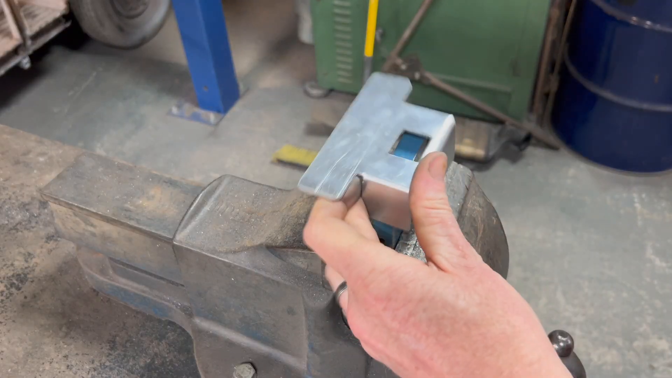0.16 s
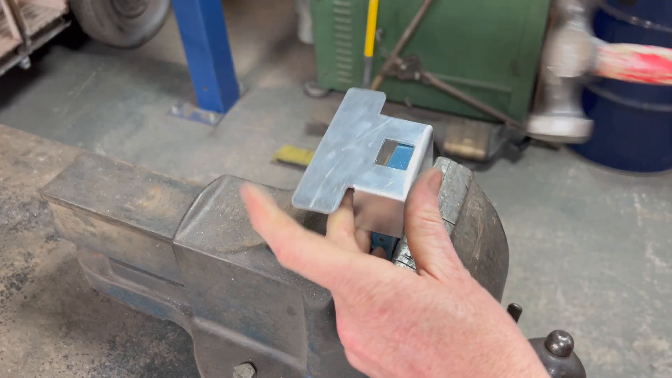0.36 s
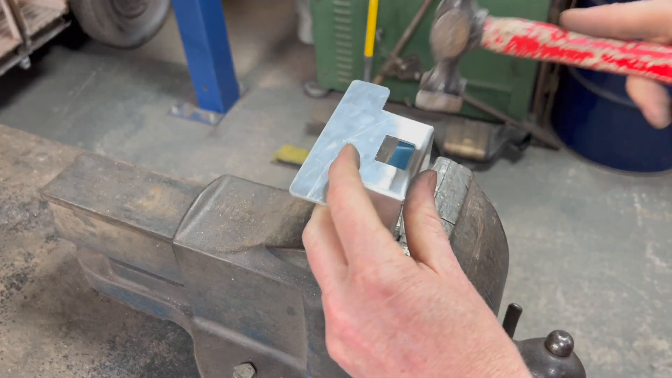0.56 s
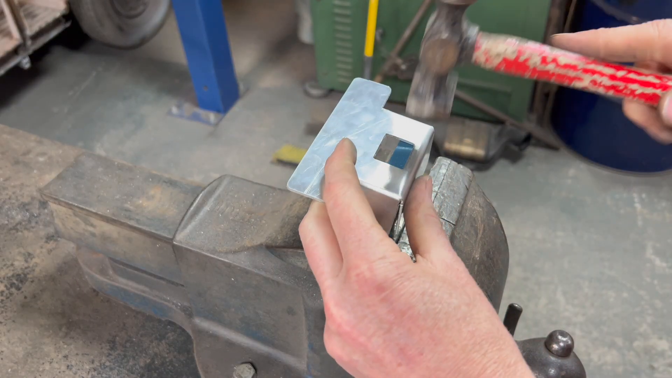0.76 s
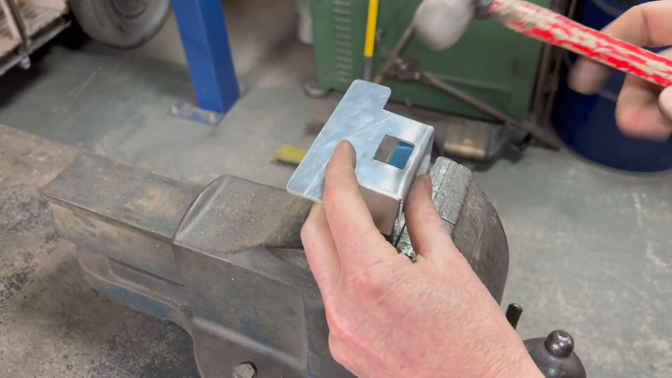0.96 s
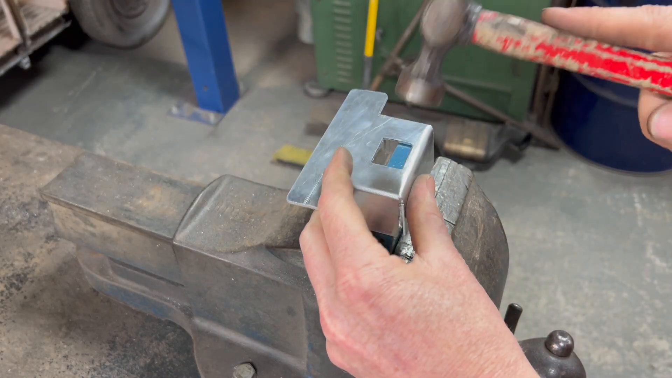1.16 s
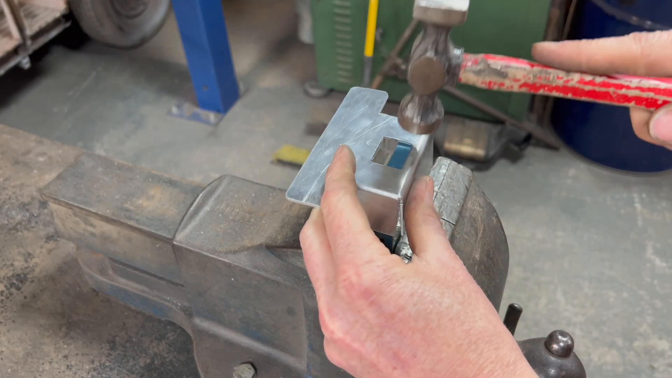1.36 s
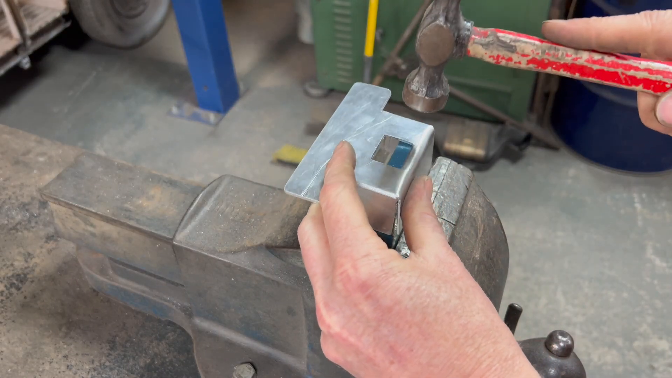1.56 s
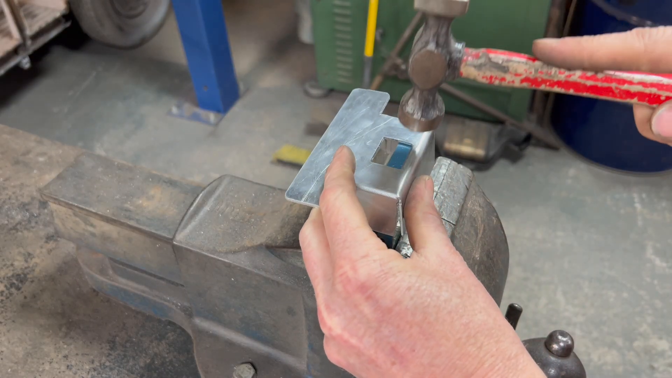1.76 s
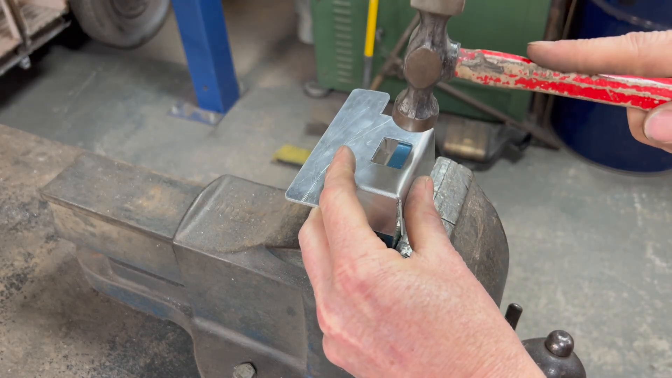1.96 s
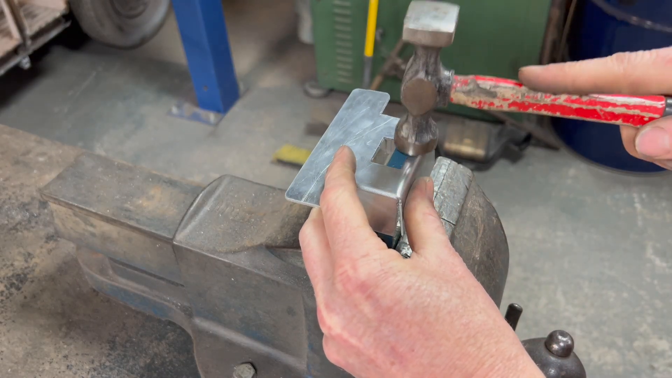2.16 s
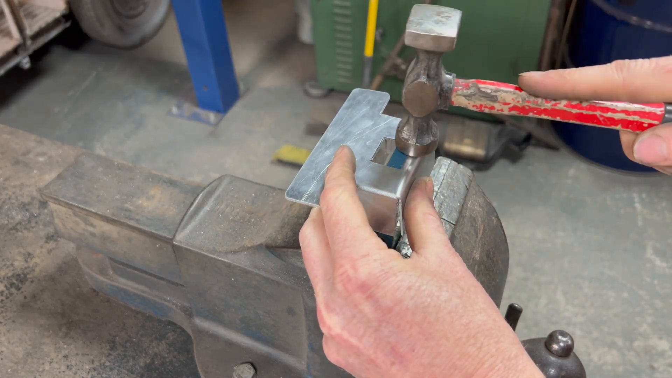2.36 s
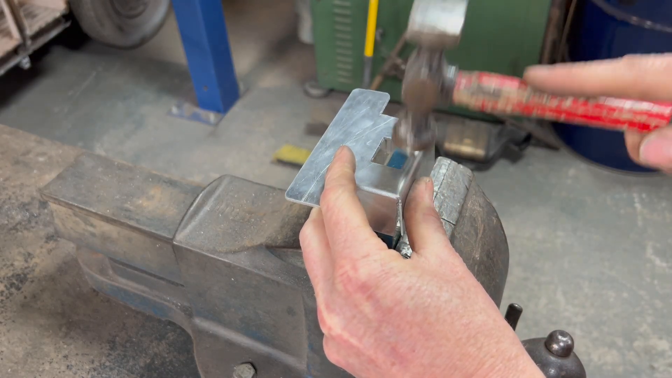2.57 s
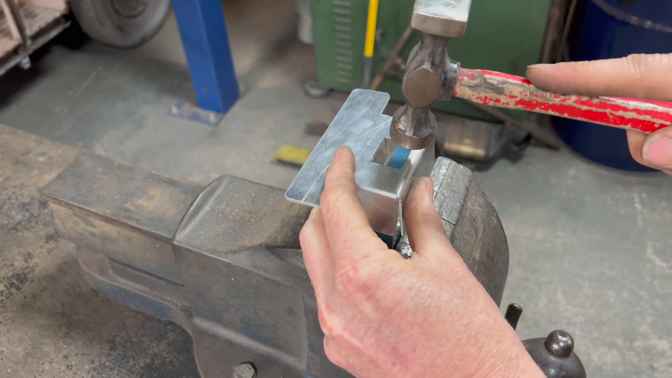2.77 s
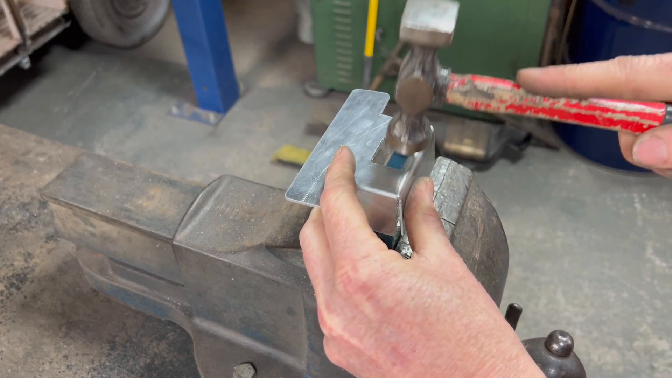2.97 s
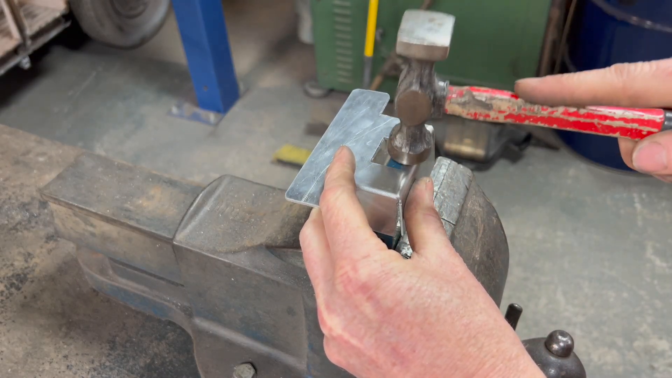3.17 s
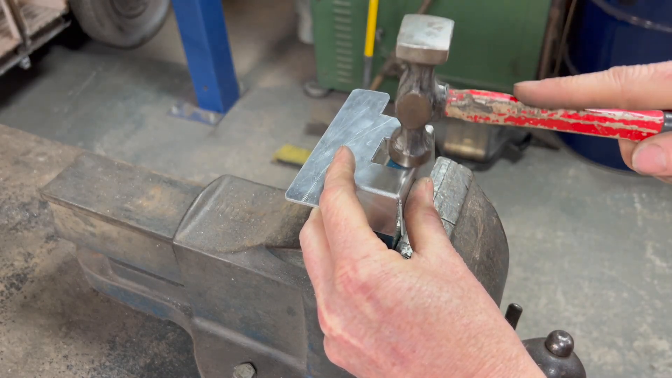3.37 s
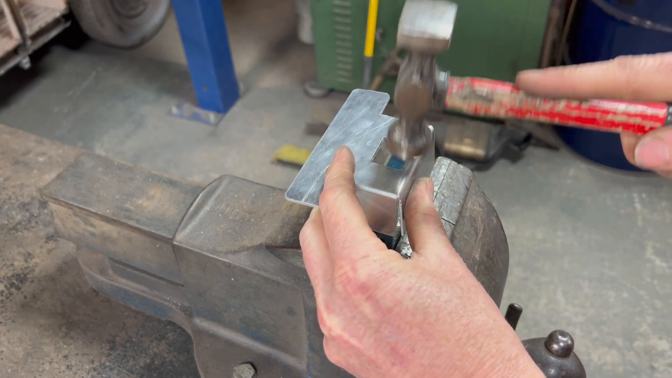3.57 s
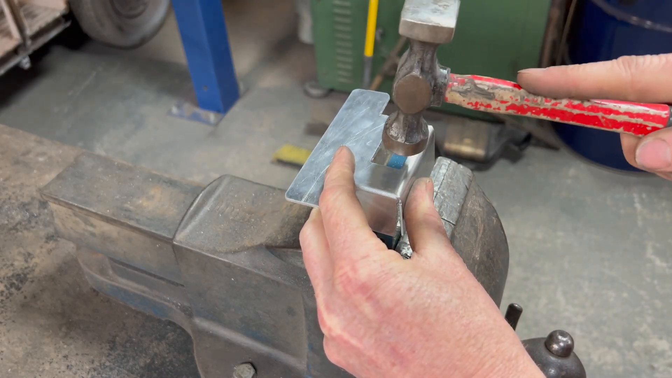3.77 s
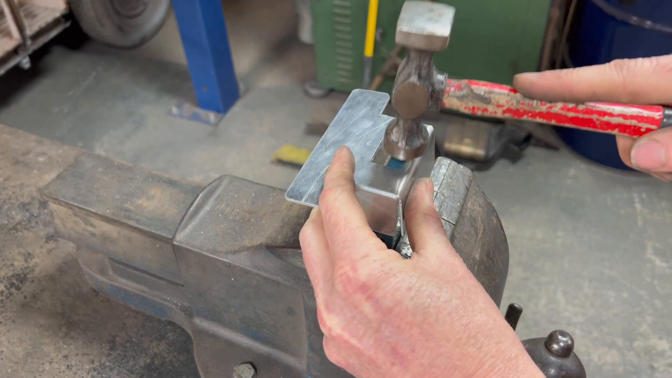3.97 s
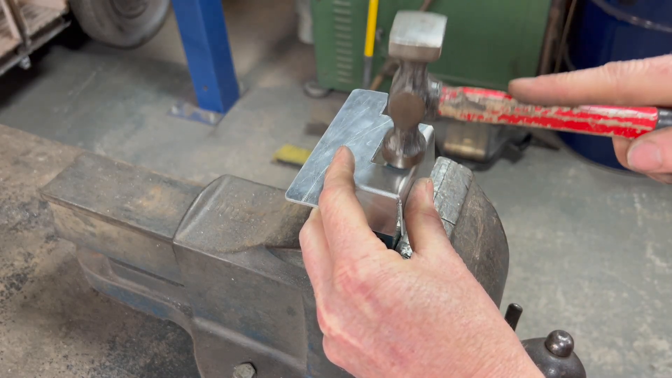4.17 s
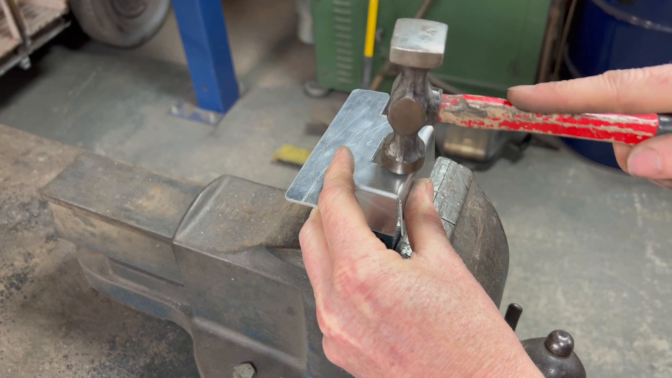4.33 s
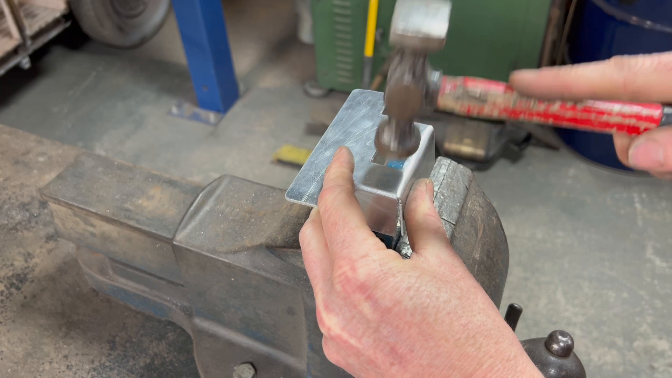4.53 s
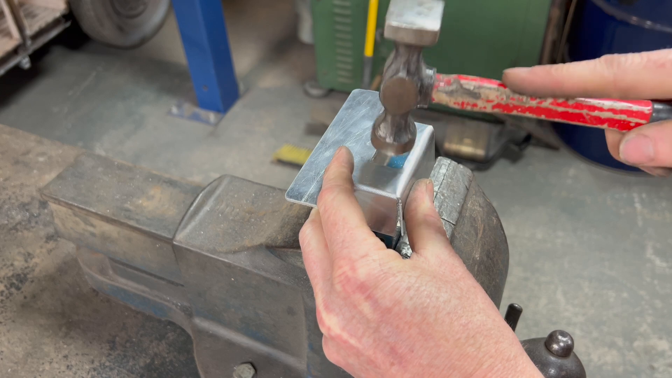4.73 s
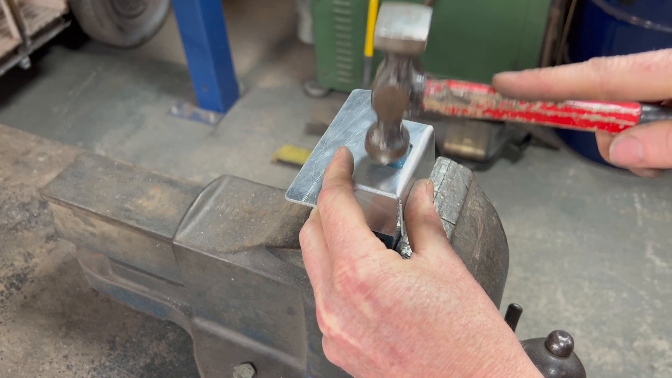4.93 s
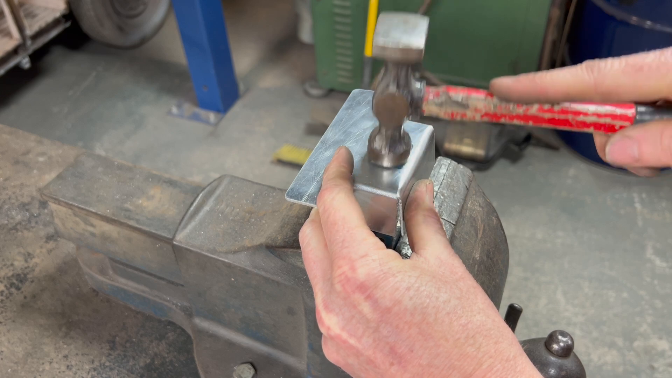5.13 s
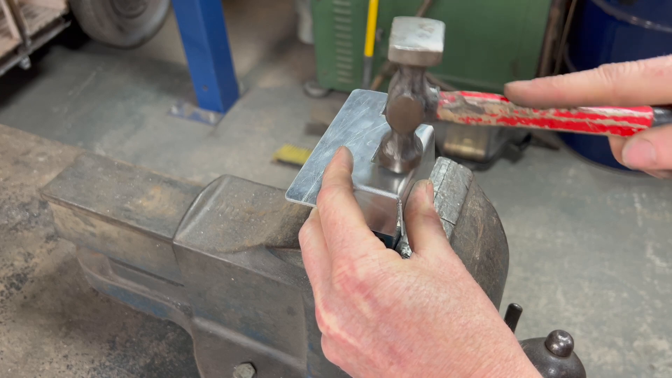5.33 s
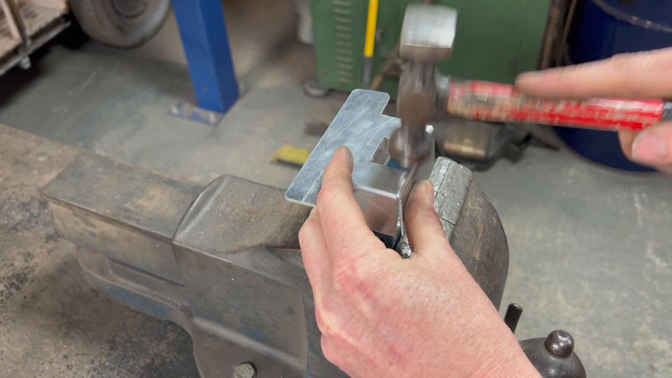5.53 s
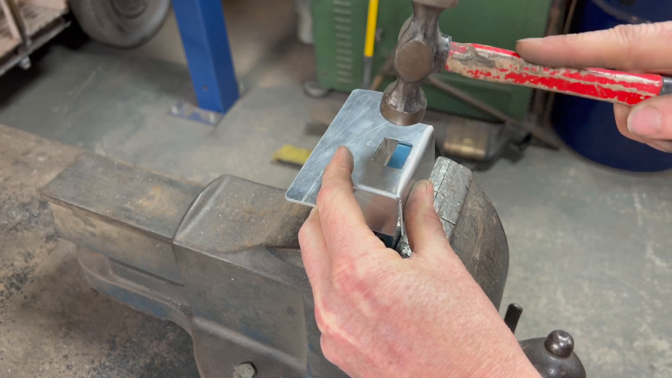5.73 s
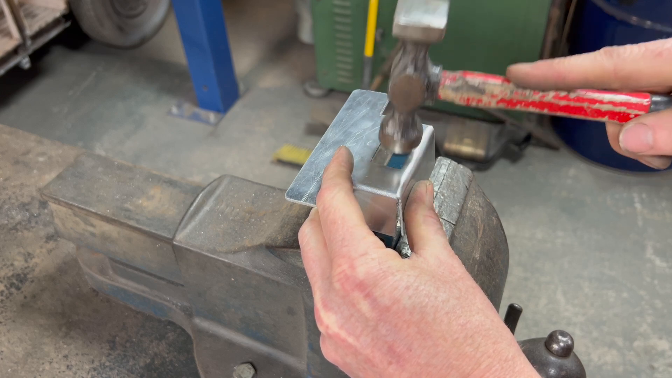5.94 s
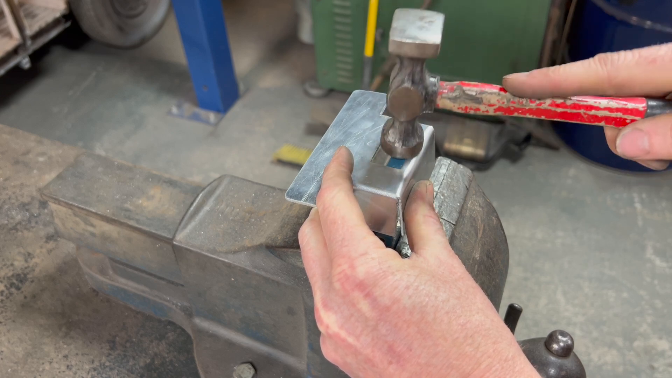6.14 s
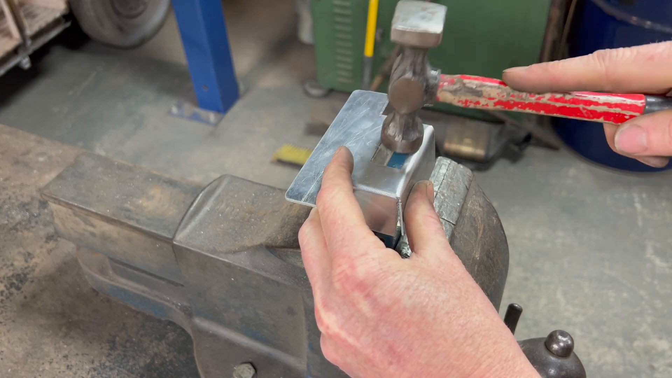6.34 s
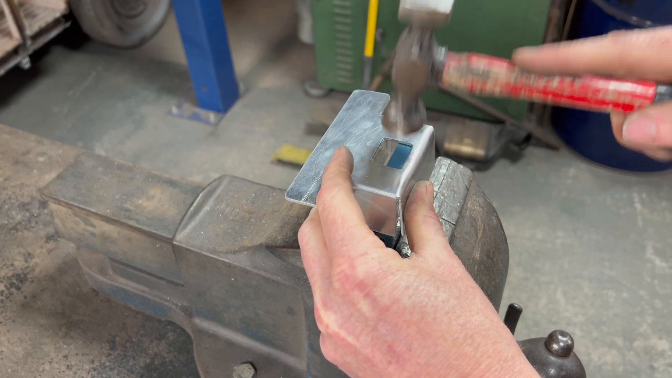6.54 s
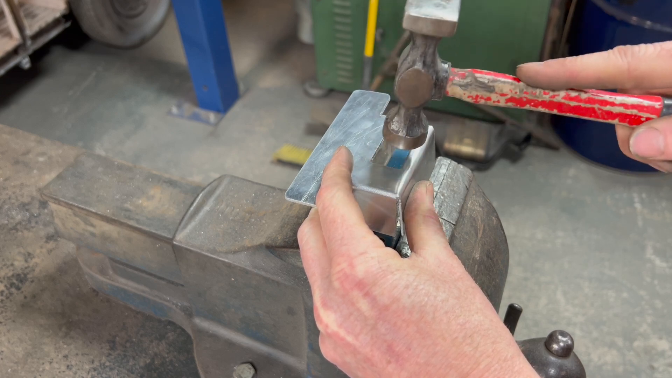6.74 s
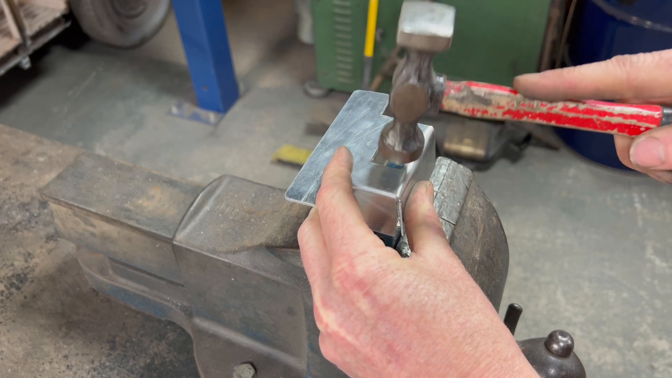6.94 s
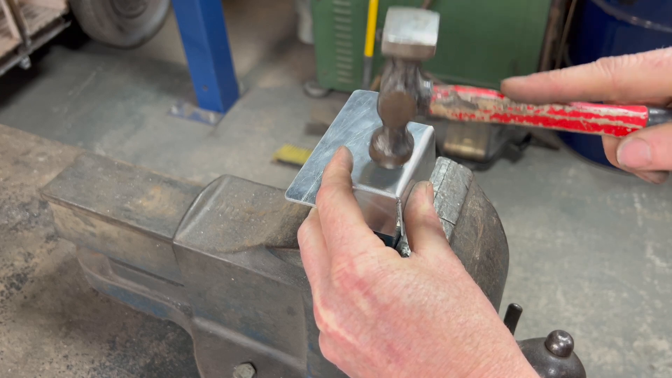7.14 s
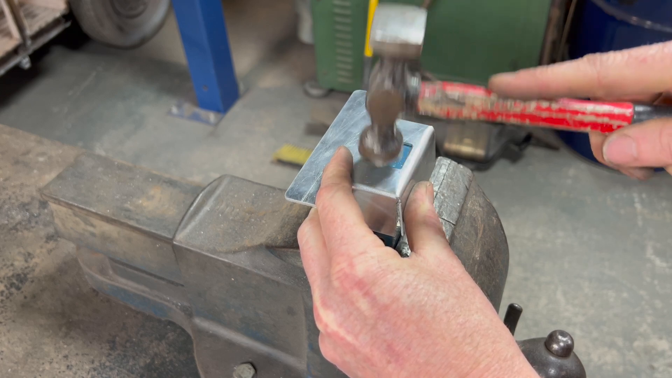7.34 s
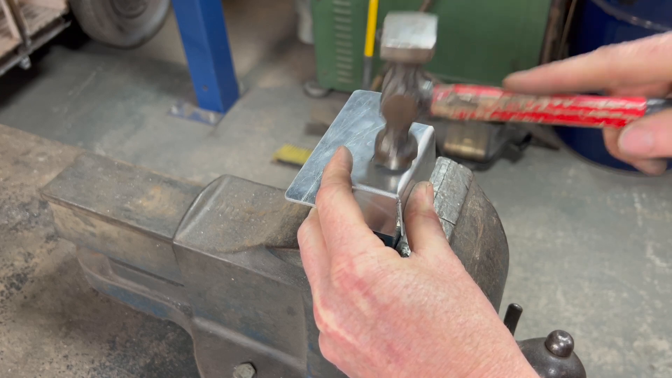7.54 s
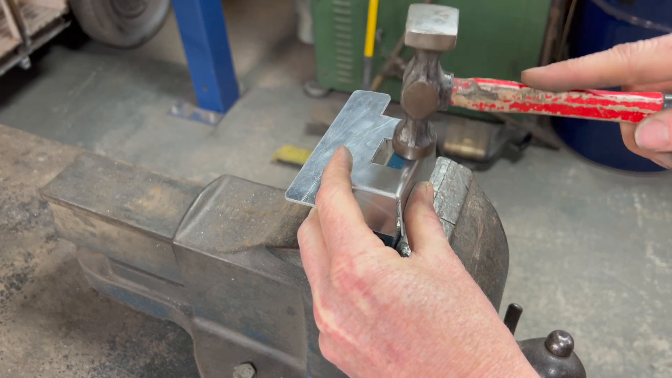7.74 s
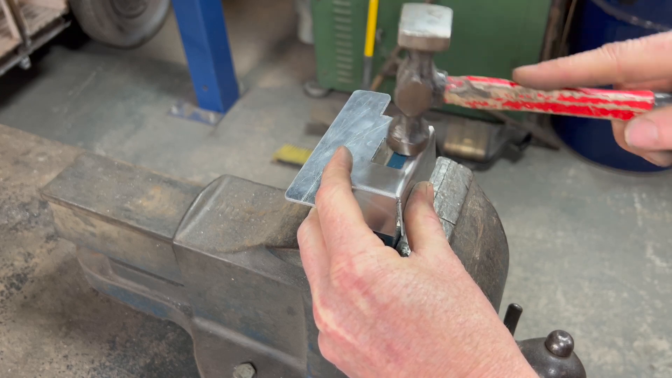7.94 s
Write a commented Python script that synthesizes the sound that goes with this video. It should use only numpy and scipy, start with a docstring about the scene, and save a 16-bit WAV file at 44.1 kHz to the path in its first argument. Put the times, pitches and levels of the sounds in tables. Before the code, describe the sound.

In a hard, reverberant workshop, a small folded sheet-metal part clinks down onto a steel vice with a quick loose rattle, then is nudged into place with faint ticks and finger rustle. After a short quiet, a small hammer taps it about four times a second, bright and clanky, growing stronger and continuing to the end. Close microphone.

```python
"""Hard workshop: a folded sheet-metal part is set down on a steel vice and shifted into place, fingers sliding
on it; then a small hammer taps it four times a second. Contacts are chattering noise bursts with damped modes;
part, hammer, vice and bench ring as sums of dying sines. Slides and background are coloured noise. The room
answers with shaped noise tails."""
import sys
import numpy as np
from scipy import signal
from scipy.fft import rfft, irfft
from scipy.io import wavfile

SR = 44100
rng = np.random.default_rng(int(sys.argv[2]) if len(sys.argv) > 2 else 0)


def to_wav(s):
    """Save 16-bit WAV."""
    ch = np.atleast_2d(s).T  # columns
    pcm = np.round(np.clip(ch, -1, 1) * 32767)  # PCM
    wavfile.write(sys.argv[1], SR, pcm.astype(np.int16))


N = 352800

# mode families of a tap: centre f/Hz, mean level/dB, slopes/dB per step: along fold, across it, firmer seating
TAP_FAMILIES = [(700.0, -19, -2.5, -2.5, -2), (1400.0, -15, -0.5, 2, 6), (3200.0, -17.5, -6, 3.5, -1.0),
                (4200.0, -16, 2, -1.0, -1.5), (5000.0, -20.0, 7.5, 3, -1.5), (6400.0, -17.0, 3, -6, -5),
                (10000.0, -21, -4.5, -0.5, 4.5), (14000.0, -32, 10.5, -10.5, -7.5)]
# hammer taps: t/s, force/dB, along fold/-1..1, across it/-1..1, seating on vice/-1..1, chatter/s,
# flap pitch factor/1
TAPS = [(2.1143, -8, -0.29, 0.37, -1.13, 0.0019, 0.94), (2.3722, -5.5, 0.42, 0.45, -0.8, 0.00099, 0.89),
        (2.627, -6.5, -0.87, -0.042, -0.09, 0.0015, 1.0), (2.883, -5.5, -0.71, 0.67, -0.55, 0.001, 0.99),
        (3.1363, -5.5, -0.31, 0.29, -0.2, 0.0015, 0.96), (3.394, -4.5, -0.03, 0.28, -0.016, 0.00079, 0.99),
        (3.6329, -5, -0.4, 0.28, -0.35, 0.0019, 0.91), (3.8722, -2.5, -0.34, -0.041, -0.28, 0.0027, 1.0),
        (4.1066, -3, -0.35, -0.11, 0.22, 0.0024, 0.98), (4.344, -2.5, -0.32, -0.41, 0.17, 0.0021, 0.99),
        (4.6122, -3.5, -0.63, -0.77, 0.35, 0.0029, 0.93), (4.858, -3, -0.27, -1.2, 0.49, 0.0024, 0.91),
        (5.0956, -1.5, 0.041, -0.83, 0.061, 0.0023, 0.92), (5.3455, -1, -0.083, -0.67, 0.078, 0.0017, 0.97),
        (5.5781, -4.0, -0.3, -0.24, -0.28, 0.0011, 0.92), (5.8567, -4.5, 0.11, -0.47, 0.26, 0.00055, 0.92),
        (6.1111, -1, 0.54, 0.11, 0.33, 0.0014, 0.94), (6.3549, -1.0, 0.62, 0.18, -0.037, 0.00081, 0.98),
        (6.602, -2, 0.67, 0.15, 0.42, 0.00034, 0.96), (6.8297, -2, 0.39, 0.44, 0.036, 0.00093, 0.94),
        (7.0512, -1.5, -0.077, -0.18, -0.51, 0.0025, 0.87),
        (7.2639, -2.5, -0.087, -0.41, -0.023, 0.0024, 0.88), (7.4851, -3, 0.22, -0.062, 0.52, 0.0016, 0.96),
        (7.7374, -2, -0.11, 0.42, -0.04, 0.0027, 0.88), (7.9567, -1.5, 0.12, 0.31, -0.088, 0.0013, 0.95)]


def gain_of(db):
    """Decibels to amplitude factor."""
    return 10 ** (np.asarray(db) / 20)


def read(points, hz):
    """Spectrum table interpolated on a log-frequency axis."""
    f, value = np.transpose(points)
    return np.interp(np.log(hz + 1), np.log(f + 1), value)


def add(mix, s, sound):
    """Mixes a sound in at a time."""
    part = mix[round(s * SR):][:len(sound)]
    part += sound[:len(part)]


def noise(colour):
    """Noise of rms 1 with the given spectrum."""
    spectrum = rfft(rng.standard_normal(N))
    x = irfft(spectrum * gain_of(read(colour, np.fft.rfftfreq(N, 1 / SR))), N)
    return x / x.std()


def ring(hz, db, t60, rise_s, size, turns=0):
    """Sum of dying sines, each swelling in over its rise time."""
    t = np.arange(size)[:, None] / SR
    envelope = gain_of(db - 60 * t / t60) * (1 - np.exp(-t / rise_s))
    return (envelope * np.sin(2 * np.pi * (hz * t + turns))).sum(1)


def families(table, spot):
    """Mode family levels for a blow landing at a spot: linear in each coordinate; returns (f/Hz, level/dB)."""
    table = np.array(table)
    level_db = table[:, 1] + table[:, 2:] @ np.array(spot)
    return np.c_[table[:, 0], level_db]


def background():
    """Background noise of the workshop: coloured noise on a level curve."""
    # t/s, level/dB
    background_level = [(0, -73.5), (.4, -67.5), (.8, -76), (1.1, -78), (1.4, -75.5), (1.65, -76),
                        (1.75, -80.5), (2.1, -82.5)]
    # f/Hz, relative level/dB
    background_colour = [(15, -34), (25, -7.5), (60, -9), (192, -5), (378, -4.5), (651, -14), (854, -14.5),
                         (1150, -11.5), (1250, -17.5), (3910, -21), (16500, -34)]
    s, db = np.transpose(background_level)
    return gain_of(np.interp(np.arange(N) / SR, s, db)) * noise(background_colour)


def rustle():
    """Fingers slide on the sheet: noise swells to each loudest moment and fades."""
    # loudest t/s, level/dB, swell/(dB/s), fade/(dB/s)
    slides = [(0.559, -77, 14, 270), (.96, -73.5, 200, 88.5), (1.055, -77, 200, 300)]
    # f/Hz, relative level/dB
    slide_colour = [(300, -14), (2000, -4.5), (4000, 2.5), (7000, 4), (10000, -1.5), (13000, -12.5),
                    (16000, -25.5)]
    t = np.arange(N) / SR
    level = np.zeros(N)
    for s, db, swell_db, fade_db in slides:
        drop_db = np.where(t < s, swell_db * (s - t), fade_db * (t - s))
        level += gain_of(db - drop_db)
    return level * noise(slide_colour)


def knocks():
    """The part meets the jaws; where it touches sets the mode families, and it rings on."""
    # t/s, force/dB, base to rim/-1..1, face to edge/-1..1, chatter/s, flap pitch factor/1,
    # into vice/dB, into room/dB, loose ring/dB, resting ring/dB
    contacts = [(0.092, -18.5, -0.33, 0.72, 0.0053, 0.76, -49, -14.5, -32, -53),
                (0.152, -42, -0.18, -0.35, 0.0042, 0.97, -32.5, -21.0, -29.5, -23.5),
                (0.203, -16.5, -0.11, 1, 0.0078, 0.91, -33, -14, -24, -24),
                (0.238, -7.5, 0.88, 0.37, 0.0023, 0.917, -63.0, -11.5, -16.5, -48),
                (0.5, -22.5, 0.5, -0.1, 0.0015, 0.98, -40, -10.5, -29, -19),
                (0.56, -43, 0.46, 0.097, 0.0021, 0.89, -30, -13, -27, -21.5),
                (0.658, -35.0, 0.42, 0.054, 0.0022, 0.89, -37, -10, -31, -28),
                (0.76, -41.5, 0.37, -0.2, 0.0016, 0.91, -21, -6.5, -33.5, -23),
                (1.019, -34, 0.44, -0.46, 0.00053, 0.81, -44, -15, -30, -27),
                (1.168, -33.5, -0.65, -0.14, 0.0018, 0.88, -17.5, -9.5, -48, -28.0),
                (1.195, -39, -0.26, -0.033, 0.0015, 1, -39.0, -13.5, -39, -32),
                (1.236, -43.5, -0.11, -0.0084, 0.003, 0.94, -21, -14, -38.0, -33),
                (1.409, -58.5, -0.97, -0.35, 0.0012, 0.97, -20.5, -1.5, -34, -27)]
    # centre f/Hz, mean level/dB, slopes/dB per step: base to rim, face to edge
    knock_families = [(700.0, -16, -11, 3), (1400.0, -16.5, -14.5, 2.5), (3200.0, -19, 2.5, 10),
                      (4200.0, -16, 1.5, 4.5), (5000.0, -19.5, 10.5, -16.5), (6400.0, -23, 2.5, 16),
                      (10000.0, -29, 6.5, 1), (14000.0, -43.5, 1.5, 2.5)]
    return [(s, force_db, families(knock_families, (rim, edge)), *rest)
            for s, force_db, rim, edge, *rest in contacts]


def causal_click(colour_db):
    """A click that starts sharply: its phase is minus the Hilbert transform of the log gain."""
    log_gain = np.log(gain_of(np.r_[colour_db, colour_db[-2:0:-1]]))
    return irfft(np.exp(np.conj(signal.hilbert(log_gain)))[:len(colour_db)])


def blow(family_db, chatter_s, pitch):
    """Tiny contacts crack and build up the damped modes; returns modes, crack and one plain contact."""
    # part pressed on the vice: f/Hz, mean level/dB, t60/s
    pressed = [(716, 5, 0.01), (1218, 5.5, 0.013), (1395, 3, 0.016), (1555, -1, 0.019), (1897, -5, 0.02),
               (2652, -14, 0.0353), (3140, 6, 0.014), (3363, 7, 0.02), (3760, -1, 0.019), (4268, 4, 0.01),
               (5029, 8.5, 0.021), (5855, -0.5, 0.018), (6336, 4, 0.019), (6676, -3.5, 0.024),
               (7020, -1.5, 0.017), (8437, -4.5, 0.013), (8660, 0, 0.016), (9990, 5.5, 0.0062),
               (10540, 1, 0.021), (11230, -3, 0.022), (11980, -4.5, 0.023)]
    # crack of steel on steel: f/Hz, relative level/dB
    crack_colour = [(60, -31.5), (250, -4), (600, 6), (1400, -6.5), (2200, -6), (3200, 5), (5000, 16),
                    (7000, 2), (7700, -1.5), (10500, 3), (13000, 4), (16000, -8)]
    hz, db, t60 = np.transpose(pressed)
    db = db + read(family_db, hz) + 1.5 * rng.standard_normal(len(hz))
    # the grip detunes the folded flap
    hz = np.where((hz > 2400) & (hz < 4600), hz * pitch, hz)
    modes = ring(hz, db, t60, chatter_s / 2.08, size=2048, turns=rng.random(len(hz)))
    f = np.fft.rfftfreq(512, 1 / SR)
    click = causal_click(read(crack_colour, f) + read(family_db, f))
    t = np.arange(1024) / SR
    chatter = rng.standard_normal(1024) * np.sqrt(t) * np.exp(-t / chatter_s)
    crack = signal.oaconvolve(click, chatter / np.linalg.norm(chatter))
    return modes, crack, click


def blows(table):
    """Places the blows; returns near sound, push on the vice, and contacts and rings that fill the room."""
    # part loose in the hand: f/Hz, level/dB, t60/s
    loose = [(849, -18, .2), (1044, -28, .6), (1310, -29.5, .5), (1416, -9.5, 0.23), (2770, -21, .5),
             (3030, -3.5, 0.16), (3030, -12, 0.11), (3359, -32, 0.93), (3950, -22, .3), (4270, -4.5, .25),
             (4190, -12.5, .5), (5010, -4.5, .17), (5085, -13, 0.39), (5846, 1, 0.19), (5870, -11.5, 0.51),
             (6140, -11.5, .23), (7100, -25, 0.27), (7220, -15.5, 0.48), (7260, -18.5, .35),
             (8160, -6.5, 0.11), (8870, -29, 0.31), (9300, -31, .26), (10300, -29.5, .3),
             (10320, -29.5, 0.27), (11500, -20, .15), (12770, -27, .1)]
    # part resting on the jaws: f/Hz, level/dB, t60/s
    resting = [(1240, -16, 0.43), (2670, -6.5, 0.11), (3240, 2, 0.094), (4570, -2, 0.11), (4706, -3.5, .16),
               (5040, -10, .15), (6200, -16.5, .15), (7500, -7.5, .04), (9300, -15, .12)]
    near, push, contacts, rings = np.zeros((4, N))
    for s, force_db, share_db, chatter_s, pitch, vice_db, room_db, *rings_db in table:
        family_db = share_db + [0, force_db]  # force raises the level column
        modes, crack, click = blow(family_db, max(chatter_s, 2e-4), pitch)
        add(near, s, modes)
        add(near, s, gain_of(18.0) * crack)
        add(rings, s, gain_of(room_db - 5.5) * modes)
        add(contacts, s, gain_of(room_db + 25.5) * click)
        add(push, s, gain_of([force_db + vice_db]))  # one-sample impulse
        # only knocks carry ring levels
        for level_db, state in zip(rings_db, (loose, resting)):
            hz, db, t60 = np.transpose(state)
            turns = rng.random(len(hz))
            clang = ring(hz, db + force_db + level_db, t60, chatter_s, size=SR // 2, turns=turns)
            add(near, s, clang)
            add(rings, s, gain_of(room_db - 16.0) * clang)
    return np.array([near, push, contacts, rings])


def vice(push):
    """Heavy vice and bench take up each blow; their modes swell in, then die."""
    # f/Hz, level/dB, t60/s
    vice_modes = [(69.7, -29.5, 0.95), (76.5, -32.5, .7), (119, -27.5, .45), (158.8, -26, .45),
                  (190, -28, 0.33), (298.8, -26.5, 0.74), (334.3, -17, 0.54), (510.6, -12.5, 0.48),
                  (551, -13.5, 0.31), (712, -16.5, .5), (864, -20, .5), (1004, -18, 0.41),
                  (1075, -13, 0.42), (1139, -16, .5), (1197, -12.5, 0.6), (1214, -11.5, .6),
                  (1272, -9.5, 0.62), (1304, -8, .7), (1357, -13, 0.47), (1404, -13, .5), (1556, -15, .45),
                  (1870, -16, .35)]
    min_rise_s = 0.0084  # the bench needs this long to swing in
    hz, db, t60 = np.transpose(vice_modes)
    response = ring(hz, db, t60, np.maximum(.6 / hz, min_rise_s), size=SR)
    return signal.oaconvolve(push, response)[:N]


def shop(x):
    """Dense echoes, each band dying at its own speed, with a quicker first part from bench and floor;
    three kindred sets of echoes take turns as the blows wander."""
    # reverberation: f/Hz, t60/s
    shop_t60 = [(100, 1), (420, 0.35), (900, 0.61), (1300, 0.57), (1800, 0.56), (2900, 0.55), (5000, 0.5),
                (7700, 0.4), (12000, 0.27), (14500, .2), (16000, 0.12)]
    # what the walls send back: f/Hz, relative level/dB
    shop_colour = [(60, -18), (130, 0.5), (210, 0.5), (320, -1.5), (500, 6), (750, -4.5), (1050, 5.5),
                   (1300, 6), (1450, 3.5), (1650, 8), (2300, 7), (3200, -6.5), (5000, -15.5), (7000, -8.5),
                   (7600, -10), (11000, -11), (16000, -14.5)]
    # echo build-up, slow in the bass: f/Hz, rise/s
    shop_build = [(100, 0), (400, 0.01), (800, 0.01), (3000, 0)]
    # amplitude share common to the echo sets: f/Hz, share/0..1
    shop_same = [(300, .95), (1500, .85), (4000, .4)]
    wander_s, level_db = 1.7, -32
    hz, t, z = signal.stft(rng.standard_normal((4, SR + SR // 2)), SR, nperseg=256)
    same = read(shop_same, hz)[:, None]
    z = same * z[0] + np.sqrt(1 - same ** 2) * z[1:]
    late = gain_of(-60 * t / read(shop_t60, hz)[:, None])
    early = gain_of(9.0 - 60 * t / 0.031)
    build = 1 - np.exp(-t / np.maximum(read(shop_build, hz), 1e-4)[:, None])
    colour = gain_of(read(shop_colour, hz))[:, None]
    tail = signal.istft(z * (late + early) * build * colour, SR, nperseg=256)[1]
    # the first echo needs a few ms
    tail *= np.clip(np.arange(tail.shape[1]) / SR / .003 - .6, 0, 1)
    tail *= gain_of(level_db) / tail[:, :SR // 10].std()
    turn = np.arange(N) / SR / wander_s + np.arange(3)[:, None] / 3
    shares = np.sqrt(8 / 9) * np.cos(np.pi * turn) ** 2  # squares sum to 1
    return signal.fftconvolve(x * shares, tail, axes=1)[:, :N].sum(0)


def taps():
    """Hammer taps on the pressed part; firmer seating sends more of a tap into vice and room."""
    return [(s, force_db, families(TAP_FAMILIES, (along, across, seat)), chatter_s, pitch,
             -27 + seat * 3.5, -10 + seat * 0.7)  # into vice/dB, into room/dB
            for s, force_db, along, across, seat, chatter_s, pitch in TAPS]


def hammer():
    """Each tap leaves hammer head and jaws ringing in close mode clusters, balanced by spot and chance."""
    # f/Hz, mean level/dB, t60/s
    steel_modes = [(1943, -31.5, 0.55), (2564, -25, 0.25), (2870, -33, .45), (3210, -27.5, 0.29),
                   (5080, -26, 0.37), (5940, -38, 0.33), (6760, -38.5, 0.36), (8200, -36.5, 0.41),
                   (8730, -42, 0.28), (10260, -47.5, .3), (10300, -49, .3)]
    spread_db, blur = 4, .009  # standard deviations; blur is relative to f
    out = np.zeros(N)
    hz, db, t60 = np.repeat(steel_modes, 4, axis=0).T
    for s, force_db, share_db, *_ in taps():
        level_draw, pitch_draw = rng.standard_normal((2, len(hz)))
        level_db = db + force_db + read(share_db, hz) + spread_db * level_draw
        mode_hz = hz * (1 + blur * pitch_draw)
        add(out, s, ring(mode_hz, level_db, t60, 0.009, size=SR // 3, turns=rng.random(len(hz))))
    return out


def rebounds():
    """The hammer rebounds after some taps: light contacts at the middle of the fold."""
    # t/s, force/dB
    light_contacts = [(3.684, -36), (4.1366, -21), (4.3935, -21.5), (6.849, -20), (7.519, -23)]
    chatter_s, pitch, vice_db, room_db = 0.0014, .96, -39, -5.5
    return [(s, force_db, families(TAP_FAMILIES, (0, 0, 0)), chatter_s, pitch, vice_db, room_db)
            for s, force_db in light_contacts]


def scene():
    """Contacts and rings get independent echo tails, so their powers add without cancelling."""
    near, push, contacts, rings = blows(knocks()) + blows(taps() + rebounds())
    # the small sheet radiates little bass
    sheet_highpass = signal.butter(2, 232, "high", fs=SR, output="sos")
    near, rings = signal.sosfilt(sheet_highpass, [near, rings])
    struck = near + hammer() + vice(push) + shop(contacts) + shop(rings)
    return (struck + rustle() + background())[None]


def record(dry):
    """The microphone drops the deepest bass; then a steep low-pass limits the treble."""
    low_hz, edge_hz = 47.6, 16600
    thin = signal.sosfilt(signal.butter(4, low_hz, "high", fs=SR, output="sos"), dry)
    lowpass = signal.firwin(511, edge_hz, window=("kaiser", 9), fs=SR)
    return signal.oaconvolve(thin, lowpass[None], "same")


dry = scene()
out = record(dry)
to_wav(out)
```